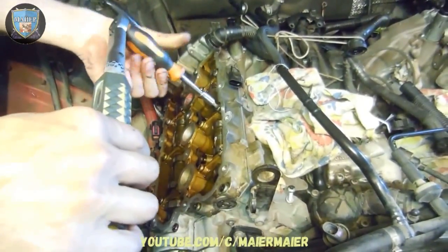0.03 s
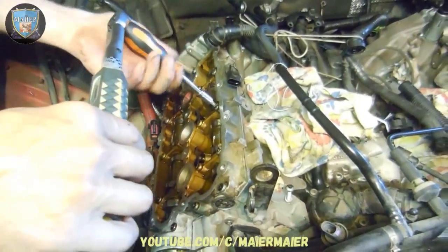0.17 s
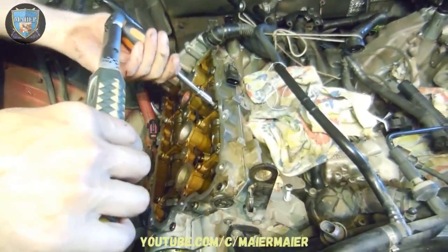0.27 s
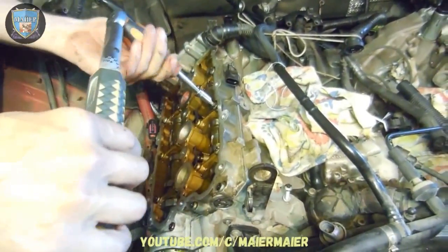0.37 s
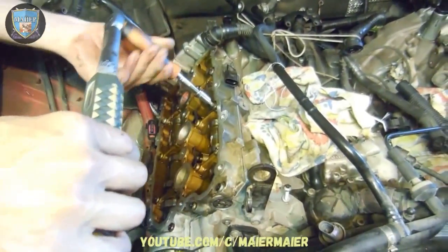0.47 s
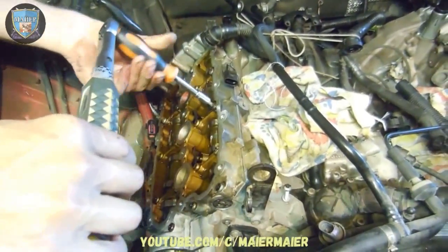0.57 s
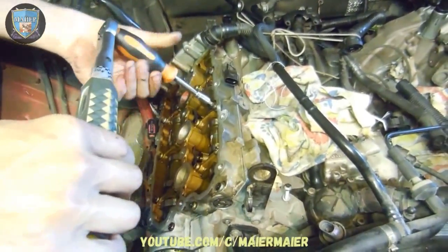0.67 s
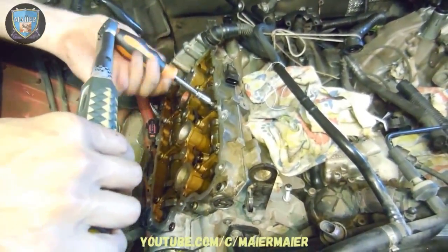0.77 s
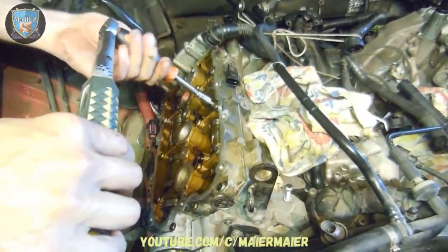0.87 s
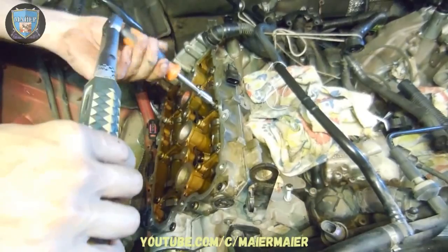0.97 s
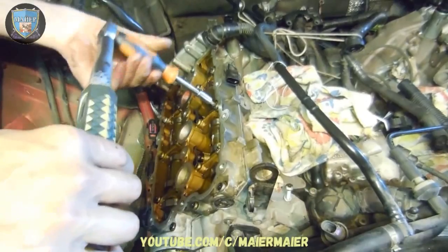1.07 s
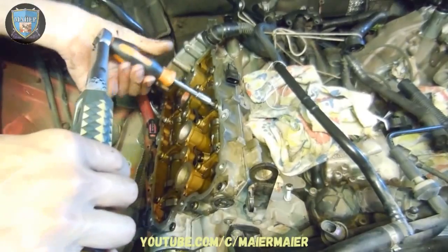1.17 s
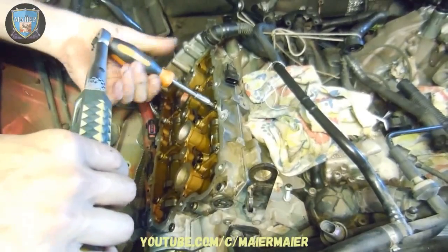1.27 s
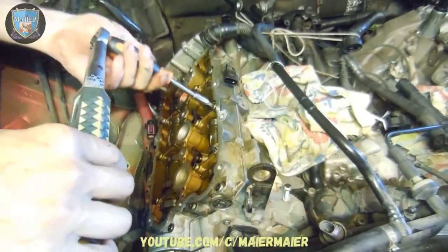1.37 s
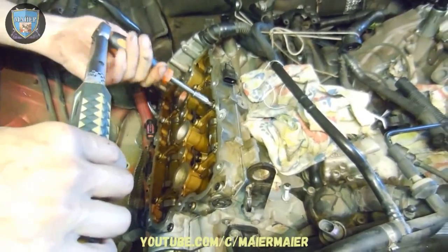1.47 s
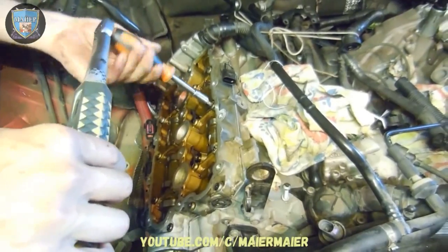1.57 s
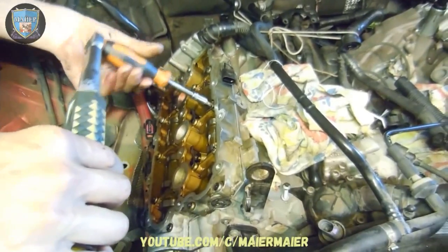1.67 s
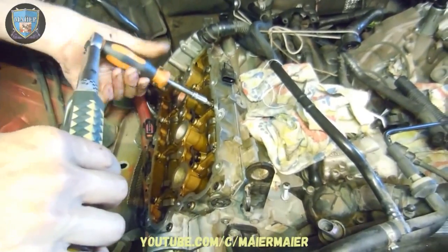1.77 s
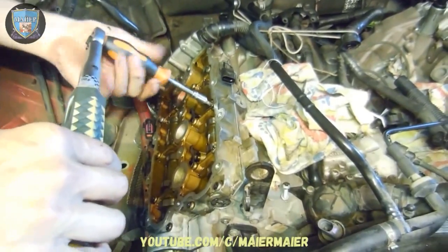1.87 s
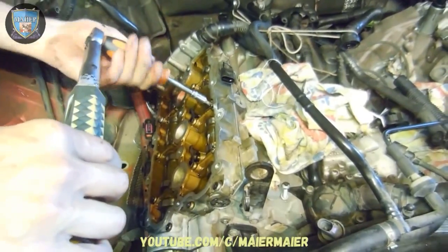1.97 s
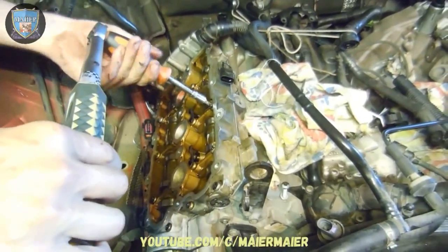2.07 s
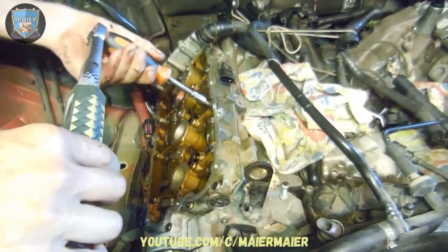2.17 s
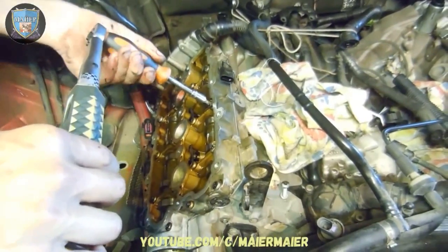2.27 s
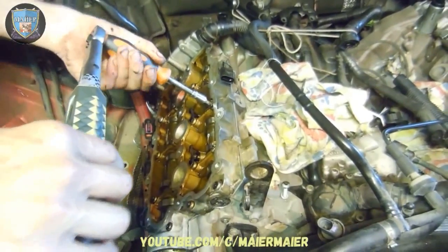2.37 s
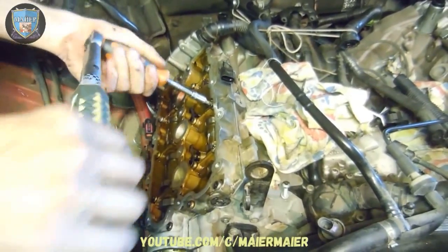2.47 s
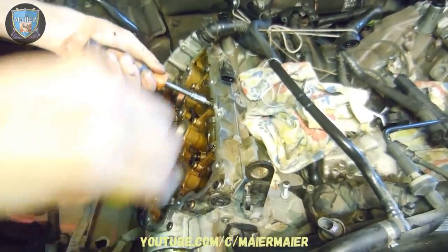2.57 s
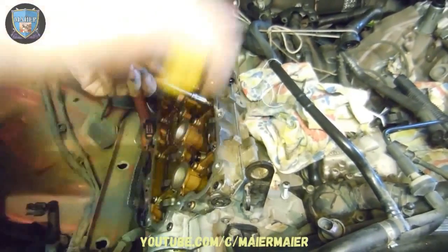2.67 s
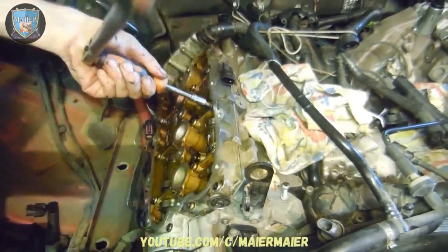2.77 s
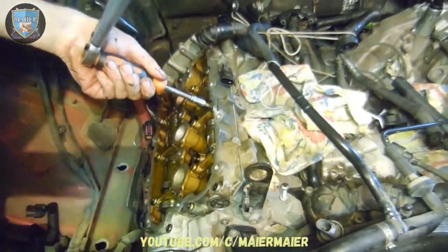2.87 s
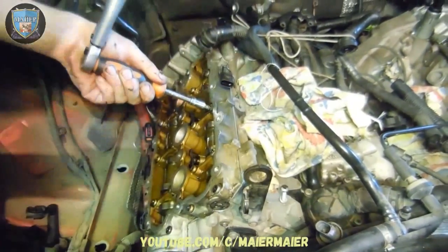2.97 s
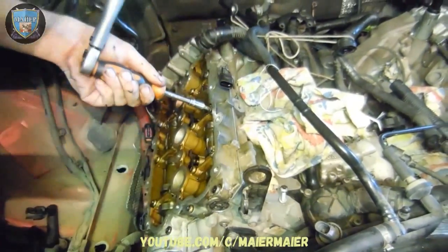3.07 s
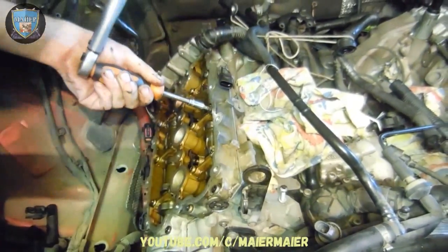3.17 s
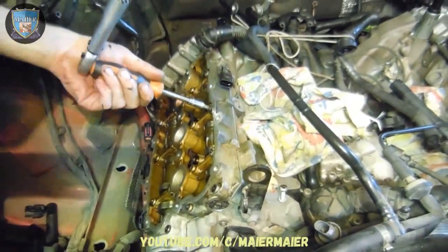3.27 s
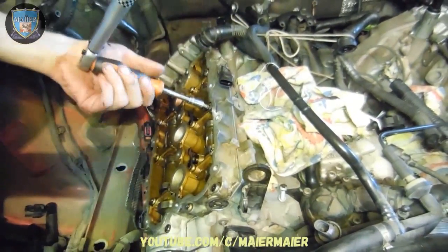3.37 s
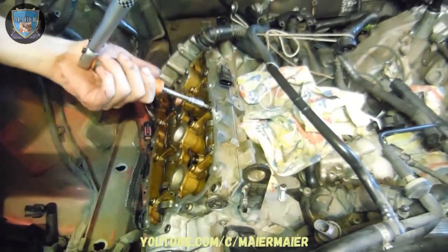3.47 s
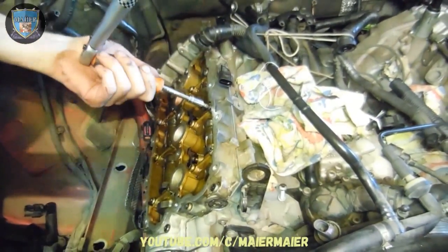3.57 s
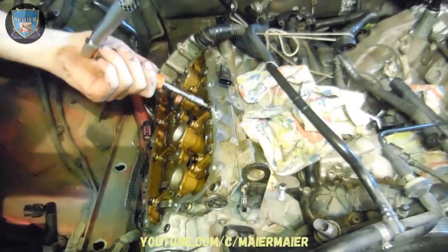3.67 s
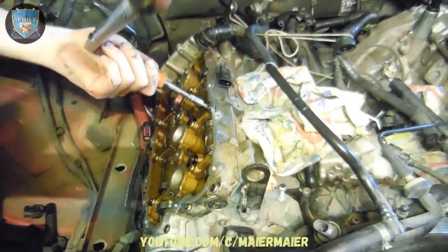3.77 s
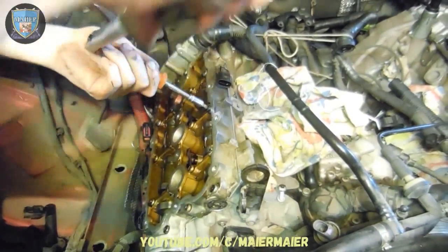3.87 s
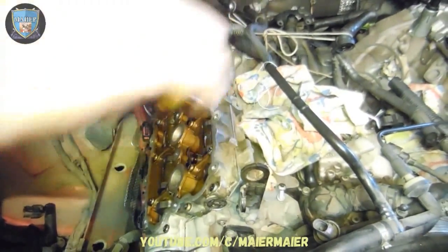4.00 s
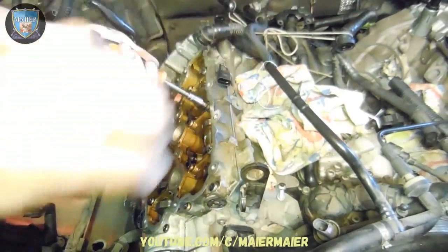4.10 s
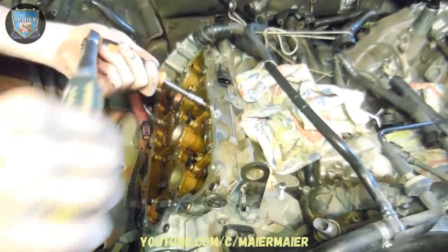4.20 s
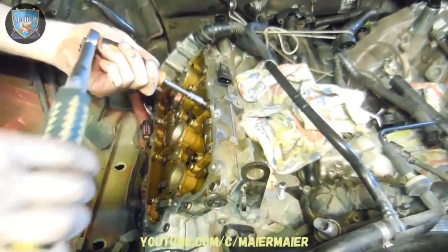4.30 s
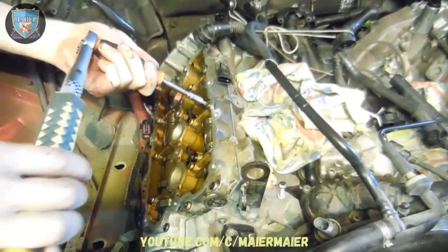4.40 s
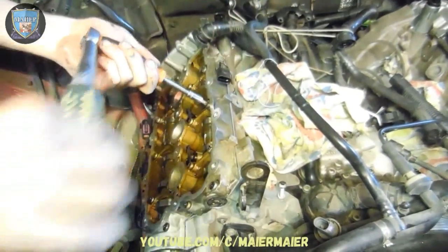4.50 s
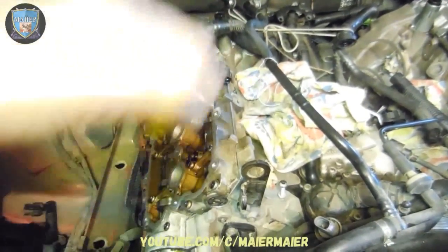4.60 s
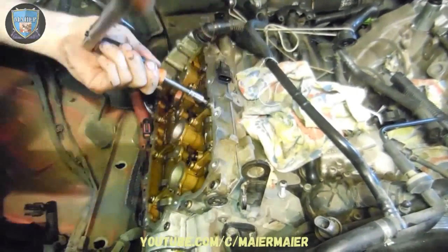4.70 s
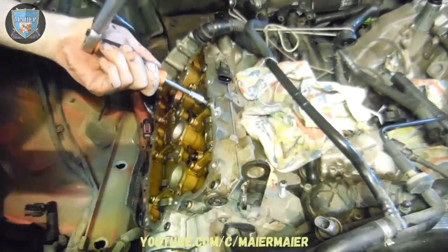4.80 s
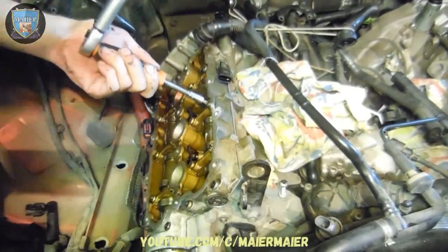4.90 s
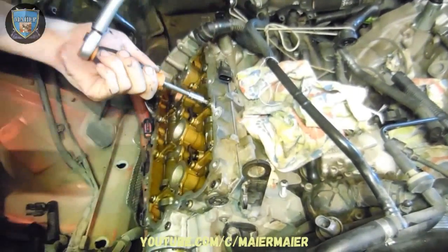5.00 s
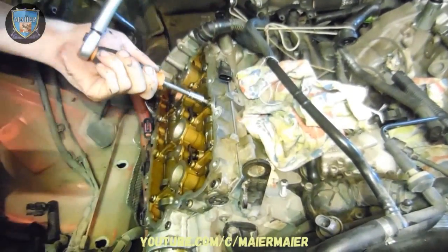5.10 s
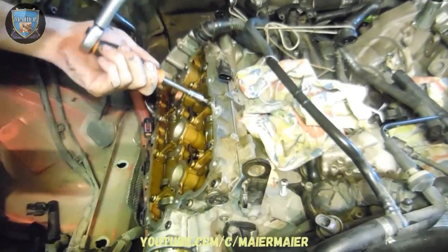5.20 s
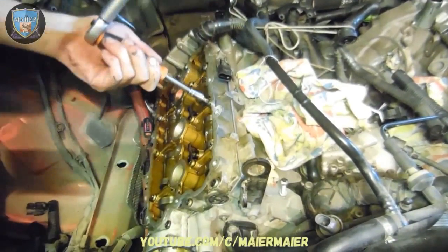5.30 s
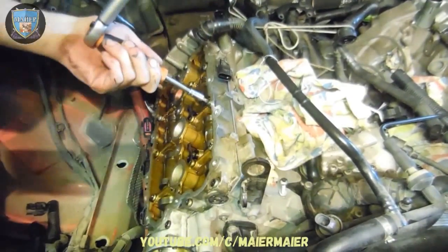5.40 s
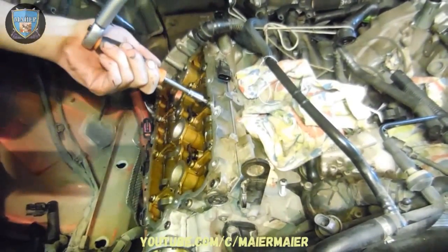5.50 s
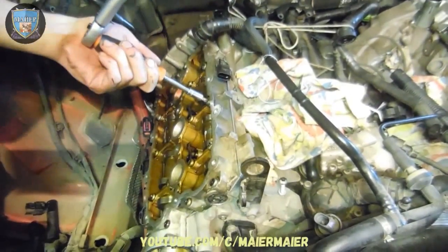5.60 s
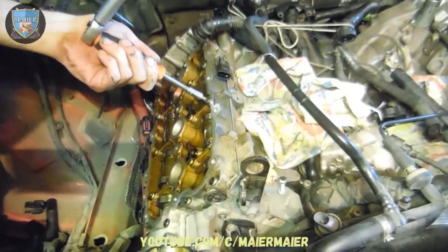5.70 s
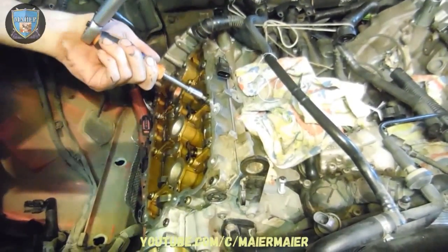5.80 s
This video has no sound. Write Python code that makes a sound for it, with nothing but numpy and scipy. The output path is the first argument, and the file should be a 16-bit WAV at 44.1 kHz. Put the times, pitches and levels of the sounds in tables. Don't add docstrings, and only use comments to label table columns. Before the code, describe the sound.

Close, bright steel clicks of a hand ratchet: four rapid bursts in the first two seconds, gritty drag between the teeth. After a pause with one faint distant knock come six slow, separate clacks, faint touches, then five more slow clacks with thin bar pings. A small workshop with short echoes from the engine bay; stereo microphone close by, light hiss.

```python
import sys
import numpy as np
from scipy import signal
from scipy.fft import rfft, irfft
from scipy.io import wavfile
from scipy.ndimage import uniform_filter1d, minimum_filter1d

SR = 44100
rng = np.random.default_rng(int(sys.argv[2]) if len(sys.argv) > 2 else 0)


def to_wav(s):
    ch = np.atleast_2d(s).T
    pcm = np.round(np.clip(ch, -1, 1) * 32767)
    wavfile.write(sys.argv[1], SR, pcm.astype(np.int16))


def boost(x):
    u = np.asarray(x, float) / 20
    return 10 ** u


N = 257984
LENGTH = 8192

# pitch_hz, fade_s (time to fall 60 dB)
WORKSHOP = [(300, 0.51), (1200, 0.37), (3000, 0.37), (9000, 0.21)]


def evened(x):
    return x / np.sqrt(np.mean(x ** 2) + 1e-20)


def read(points, hz):
    f, value = np.transpose(points)
    return np.interp(np.log(hz + 1), np.log(f + 1), value)


def add(mix, s, sound):
    part = mix[:, max(round(s * SR), 0):][:, :sound.shape[1]]
    part += sound[:, :part.shape[1]]


def dying(decays, size):
    hz, t, z = signal.stft(rng.standard_normal((2, size)), SR, nperseg=128)
    fade = boost(-60 * t / read(decays, hz)[:, None])
    return signal.istft(z * fade, SR, nperseg=128)[1][:, :size]


def causal(gain_db):
    cepstrum = irfft(np.maximum(gain_db, -100) * np.log(10) / 20, LENGTH)
    cepstrum[1:LENGTH // 2] *= 2
    cepstrum[LENGTH // 2 + 1:] = 0
    return np.exp(rfft(cepstrum))


def tooth_crack(grain, after, struck):
    u = after / .00022
    burst = u ** 2 * np.exp(-u * 1.6) * (grain[0] + .4 * grain[1:])
    crack = rfft(burst)
    crack /= uniform_filter1d(abs(crack) ** 2, size=150) ** .48
    return rfft(irfft(crack, LENGTH) * struck)


def pawl_chatter(grain, since, after, struck, slip_db, chatter_db, chatter_ms):
    slip = boost(slip_db) * np.exp(since / .0011) * ~struck
    uneven = boost(3.5 * evened(uniform_filter1d(rng.standard_normal(LENGTH), size=40)))
    swell = (1 - np.exp(-after / .00022 / 3)) * np.exp(-after * 1000 / chatter_ms)
    return boost(chatter_db) * (uneven * swell + slip) * (1.64 * grain[0] + grain[1:])


def bay_echoes(t, bay_db):
    # pitch_hz, fade_s (time to fall 60 dB)
    bay = [(300, 0.4), (1500, 0.28), (4500, 0.083), (12000, 0.14)]
    room = boost(-6.5) * dying(WORKSHOP, LENGTH) * signal.windows.tukey(LENGTH, .5)
    echoes = (dying(bay, LENGTH) + room) * (t < .175)
    return boost(bay_db) * np.roll(echoes, 330, axis=1)


def tool_ring(t, low_hz, high_hz):
    # pitch_hz, level_db, fade_s (time to fall 60 dB)
    steel = [(1250, -29, 0.12), (2120, 4, 0.067), (2480, -32, 0.15), (2850, 3, 0.02), (3935, 3.5, 0.09),
             (4860, -26, 0.09), (5140, 7, 0.03), (6350, -48, 0.027), (6360, -67, .035), (7800, -69, .03),
             (9400, 8.5, 0.012), (11300, -32, .025)]
    longest_s, grip_db = .035, 5
    ring = np.zeros(LENGTH)
    grips = rng.standard_normal((len(steel), 2))
    for (hz, db, fade_s), (damping, detune) in zip(steel, grips):
        level_db = db - 40.5 + grip_db * np.tanh(damping) - 60 * t / min(fade_s, longest_s)
        ring += boost(level_db) * np.sin(2 * np.pi * hz * (1 + 0.0056 * detune) * t)
    for hz in (low_hz, high_hz):
        ring += boost(-35 - 60 * t / 0.0074) * np.sin(2 * np.pi * hz * t)
    return ring


def click(s, db, low_hz, high_hz, body_db, treble_db, knee_hz, low_db, high_db,
          slip_db, chatter_db, chatter_ms, bay_db):
    # pitch_hz, level_db
    crack_colour = [(88, -56), (150, -36), (512, -23.5), (1170, -8.5), (1580, -11.5), (2440, -3),
                    (3220, -4), (3780, -5), (4340, -5.5), (4890, -3.5), (6570, 2.5), (15100, -2.5),
                    (17000, -24)]
    # pitch_hz, level_db
    right_louder = [(500, -3.5), (1000, -1.5), (2400, 0.5), (4500, 1), (8000, 1), (13000, 6.5)]
    t, hz = np.arange(LENGTH) / SR, np.fft.rfftfreq(LENGTH, 1 / SR)
    since = t - .0055
    after, struck = np.maximum(since, 0), since >= 0
    grain = rng.standard_normal((3, LENGTH))

    crack = tooth_crack(grain, after, struck)
    chatter = pawl_chatter(grain, since, after, struck, slip_db, chatter_db, chatter_ms)
    ringing = crack * (1 + rfft(tool_ring(t, low_hz, high_hz)))
    duller_db = read([(1400, 0), (2600, -3), (4500, 0), (7500, -4), (14000, -7)], hz)
    tail = rfft(chatter + bay_echoes(t, bay_db)) * boost(duller_db) * (hz < 15900)

    tilt = [(1700, body_db + 24.5), (2300, 0), (knee_hz, 0), (11000, treble_db + 23.5)]
    colour_db = read(crack_colour, hz) + read(tilt, hz)
    for ring_hz, ring_db in ((low_hz, low_db), (high_hz, high_db)):
        colour_db += ring_db * np.exp(-(np.log((hz + 1) / ring_hz) / 0.14) ** 2)
    right = boost(read(right_louder, hz) / 2) * np.exp(-2j * np.pi * hz * .000016)
    sides = np.array([1 / right, right])
    sound = irfft((ringing + tail) * causal(colour_db) * sides, LENGTH)
    return s - .005, boost(db) * sound / abs(sound.mean(0)).max()


def quick_swings(mix):
    # start_s, peak_db, lower_ring_hz, upper_ring_hz
    drops = [(0.011, -8.5, 4200, 6500), (0.0449, -7.5, 3980, 6100), (0.0857, -7.5, 2020, 9300),
             (0.4473, -6, 3060, 5600), (0.4804, -11.5, 3730, 10200), (0.5107, -7.5, 2250, 8340),
             (0.5317, -7, 2350, 5500), (0.5535, -6, 3200, 5300), (0.5851, -10, 3120, 6400),
             (0.62, -7, 3860, 7800), (0.6741, -6, 4400, 6360), (0.9974, -5, 4140, 6040),
             (1.0297, -6.5, 2920, 5540), (1.057, -9, 4100, 6240), (1.0853, -8.5, 4540, 9000),
             (1.1098, -6.5, 4180, 8700), (1.1372, -7, 2120, 8600), (1.178, -9, 3930, 7400),
             (1.2268, -5.5, 2150, 2700), (1.577, -4, 2520, 4200), (1.6069, -10.5, 2340, 5270),
             (1.6348, -6.5, 3970, 11400), (1.6615, -8, 3900, 6120), (1.6826, -9.5, 3370, 6100),
             (1.701, -10.5, 2160, 9000), (1.728, -9, 2120, 6500)]
    brisk_gap_s, rest_gap_s = .025, 0.032
    gaps = np.minimum(np.diff([-1] + [row[0] for row in drops]), rest_gap_s)
    for row, slower in zip(drops, np.log2(gaps / brisk_gap_s)):
        body_db = -25 - 3 * slower
        treble_db = -18 - 5.5 * slower
        add(mix, *click(*row, body_db, treble_db, knee_hz=7400, low_db=6.0, high_db=5.5,
                        slip_db=-25, chatter_db=-20.5, chatter_ms=4.3, bay_db=-32))


def slow_turns(mix):
    # start_s, peak_db, lower_ring_hz, upper_ring_hz, body_db
    drops = [(2.586, -8.5, 3480, 10500, -25.5), (2.6808, -9.5, 2350, 6300, -34.5),
             (2.7604, -3, 3730, 6570, -28.5), (2.8346, -6, 3660, 5500, -22.5),
             (2.9162, -7, 3750, 7100, -29.5), (3.0148, -2.5, 2650, 6740, -31),
             (4.6873, -7, 2960, 8600, -37), (4.7463, -6, 3760, 8050, -24),
             (4.8166, -6.5, 2860, 7800, -25.5), (4.886, -3.5, 3530, 7400, -34),
             (4.987, -7.5, 2900, 6640, -29)]
    for row in drops:
        add(mix, *click(*row, treble_db=-21.5, knee_hz=7400, low_db=8.5, high_db=3.5,
                        slip_db=-2.0, chatter_db=-25.5, chatter_ms=4.33, bay_db=-35))


def small_touches(mix):
    # start_s, peak_db, lower_ring_hz, upper_ring_hz
    ticks = [(0.6604, -26, 2100, 6400), (1.26, -21.5, 1830, 3660), (2.073, -39.5, 1310, 4500),
             (2.501, -31.5, 2120, 3740), (3.178, -45.5, 2480, 3750), (3.2203, -34, 2420, 5900),
             (3.248, -38, 2040, 3860), (3.263, -33, 2210, 4100), (3.2907, -40, 1250, 4600),
             (4.5604, -31, 1020, 4160), (4.6154, -29, 2400, 3180), (4.9827, -26, 2770, 10000),
             (5.0344, -34, 2800, 4660), (5.0544, -37.5, 1070, 6270), (5.2358, -26, 2740, 2300),
             (5.304, -42, 2480, 4870), (5.4007, -39.5, 2340, 3700), (5.551, -36, 2410, 3330)]
    # start_s, peak_db, lower_ring_hz, upper_ring_hz, treble_db
    snaps = [
        (1.5413, -36.5, 1030, 3000, -49),
        (2.529, -27, 4200, 4850, -48),
        (2.533, -34, 2300, 4650, -10),
        (2.546, -31, 2760, 5130, -20),
        (2.56, -33, 3440, 3550, -14),
        (3.8365, -31, 5600, 8450, -14),
        (3.915, -42.5, 2510, 5800, -19),
        (3.944, -42, 1960, 3550, -19),
        (4.545, -27.5, 3160, 4730, -28),
        (5.1749, -16, 2640, 4240, -39.5),
    ]
    # start_s, peak_db, strongest_ring_hz
    rebounds = [(.0735, -28, 5000), (0.091, -26, 2560), (0.981, -33, 1460), (.991, -34, 2500),
                (1.031, -40, 3900), (1.103, -19, 6160), (1.6108, -25, 2450), (1.666, -22, 4800),
                (1.689, -18, 2360), (1.692, -15.5, 2500), (1.7196, -18, 5970), (2.5185, -36, 3070),
                (2.6553, -47, 3100), (4.6889, -15.5, 3820), (4.7377, -32, 6000), (4.8732, -33, 2400),
                (4.8827, -22, 1130), (4.9768, -24, 3650)]
    touches = [(*row, -16, -43.5) for row in ticks]
    touches += [(*row, -36, treble_db) for *row, treble_db in snaps]
    touches += [(s, db, hz, 2.0 * hz, -22, -32) for s, db, hz in rebounds]
    for row in touches:
        add(mix, *click(*row, knee_hz=4500, low_db=13.5, high_db=8.0,
                        slip_db=-7.5, chatter_db=-26, chatter_ms=6.0, bay_db=-32.5))


def pawl_drag(mix):
    # start_s, end_s, level_db
    swings = [
        (0, 0.098, -40),
        (0.449, 0.678, -42),
        (0.989, 1.265, -41),
        (1.577, 1.742, -37),
        (2.496, 3.019, -54.5),
        (4.685, 4.997, -54.5),
    ]
    # pitch_hz, level_db
    drag_colour = [(500, -22.5), (1100, 4), (2200, 1), (4000, -1), (8000, -6), (15500, -13.5), (15900, -78)]
    for start, end, db in swings:
        size = round((end - start) * SR)
        uneven = boost(5 * evened(uniform_filter1d(rng.standard_normal(size), size=60)))
        grit = rng.standard_normal((3, size)) * uneven
        colour = boost(read(drag_colour, np.fft.rfftfreq(size, 1 / SR)))
        grit = irfft(rfft(grit[0] + grit[1:]) * colour, size)
        add(mix, start, boost(db) * evened(grit) * signal.windows.tukey(size, .15))


def handle_thumps(mix):
    # start_s, level_db
    jolts = [
        (.448, -27),
        (.998, -25),
        (1.085, -28),
        (1.578, -21),
        (2.837, -48),
        (3.017, -24),
        (4.746, -21.5),
        (4.986, -29),
        (5.178, -31),
    ]
    u = np.arange(600) / SR / 0.0002
    for s, db in jolts:
        add(mix, s, boost(db) * u * (2 - u) * np.exp(-u) * np.ones((2, 1)))


def bar_pings(mix):
    # start_s, level_db
    pings = [
        (4.617, -42),
        (4.687, -56),
        (4.889, -44),
        (4.988, -58),
        (5.177, -48),
        (5.238, -48.5),
    ]
    # pitch_hz, level_db, fade_s (time to fall 60 dB)
    bar = [(2500, 0, .6), (2700, -1, .35)]
    t = np.arange(LENGTH * 2) / SR
    ring = sum(boost(db - 60 * t / fade_s) * np.sin(2 * np.pi * hz * t) for hz, db, fade_s in bar)
    for s, db in pings:
        waver = rng.standard_normal((2, len(t)))
        waver = uniform_filter1d(uniform_filter1d(waver, size=350), size=350)
        add(mix, s, boost(db) * ring * (.45 + .7 * np.tanh(evened(waver))))


def focus_step(s, db, hz):
    t = np.arange(700) / SR
    shape = (1 - np.exp(-t / 0.0011)) * np.exp(-t / 0.004)
    hum = np.sin(2 * np.pi * hz * t) + .3 * np.sin(2 * np.pi * 2.25 * hz * t)
    return s, boost(db + 4.5) * shape * hum * np.array([[1.1], [.9]])


def focus_motor(mix):
    # first_step_s, last_step_s, level_db
    runs = [
        (.1131, .3775, -43.5),
        (0.7304, .7302, -45.5),
        (.7779, .9164, -42),
        (5.222, 5.222, -45),
        (5.5514, 5.818, -46.5),
    ]
    step_s = 1 / 15
    for first, last, db in runs:
        steps = round((last - first) / step_s) + 1
        for k, s in enumerate(np.linspace(first, last, steps)):
            add(mix, *focus_step(s, db - 0.6 * k, 1130 + 12 * k))


def far_knock(mix):
    # pitch_hz, level_db
    knock_colour = [(100, -33), (300, -17.5), (600, -9.5), (1300, -11), (1600, -14), (2800, -21),
                    (5000, -22.5), (10000, -24), (15500, -30), (15900, -90)]
    # pitch_hz, width_hz, level_db
    panel = [(437, 17, -10), (631, 38, -5.5), (930, 39, -4.5), (1155, 76, -4.5), (1340, 61, -1),
             (1950, 120, -8), (2700, 330, -4.5)]
    t, hz = np.arange(SR) / SR, np.fft.rfftfreq(SR, 1 / SR)
    tail = dying(WORKSHOP, SR)
    tail = (tail + 0.32 * tail[::-1]) * (1 - np.exp(-t / 0.0061))
    resonance = 1 + sum(boost(db + 13) / (1 + (2 * (hz - f) / width) ** 2) for f, width, db in panel)
    tail = irfft(rfft(tail) * boost(read(knock_colour, hz)) * resonance, SR)
    add(mix, 1.879, boost(-35) * tail / tail[:, 300:1800].std())


def air():
    # pitch_hz, level_db (per Hz)
    air_colour = [(12, -53), (20, 0), (55, -19.5), (162, -8.5), (214, -10.5), (267, -2.5), (453, -4),
                  (770, 1), (935, -1), (1780, -2), (5720, -8.5), (12800, -16), (15600, -20)]
    # pitch_hz, likeness (0 to 1)
    likeness = [(60, 0.14), (180, 0.42), (550, 0.3), (1650, 0.07), (4970, 0.02), (15000, 0.022)]
    frames, hz = N // 256 + 5, np.fft.rfftfreq(1024, 1 / SR)
    a, b, c, d, patches = rng.standard_normal((frames, 513, 5)).T
    patches = evened(uniform_filter1d(uniform_filter1d(patches, 12, 0), 20, 1))
    same = np.clip(read(likeness, hz), -1, 1)[:, None]
    left = a + 1j * b
    right = same * left + np.sqrt(1 - same ** 2) * (c + 1j * d)
    z = np.array([left, right])
    z *= boost(read(air_colour, hz)[:, None] + .8 * patches) * (hz < 15900)[:, None]
    both = signal.istft(z, nperseg=1024, noverlap=768)[1][:, :N]
    return boost(-56) * both / both.mean(0).std() * boost([[-.25], [.25]])


def scene():
    mix = air()
    for source in (quick_swings, slow_turns, small_touches, pawl_drag, handle_thumps, bar_pings,
                   focus_motor, far_knock):
        source(mix)
    return mix


def top_cut(x):
    return signal.sosfilt(signal.butter(12, 17150, fs=SR, output="sos"), x)


def record(dry):
    low_pass = signal.firwin(255, 16900, window=("kaiser", 9), fs=SR)
    dull = signal.oaconvolve(dry, low_pass[None], "same")
    peaks = -minimum_filter1d(-abs(dull), size=89)
    held = dull / np.maximum(uniform_filter1d(peaks, size=45) / .88, 1)
    return top_cut(held)


dry = scene()
out = record(dry)
to_wav(out)
```